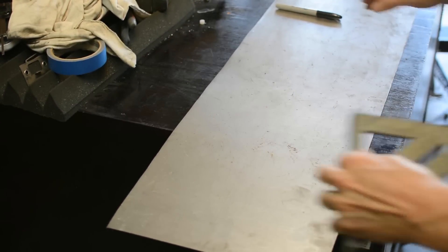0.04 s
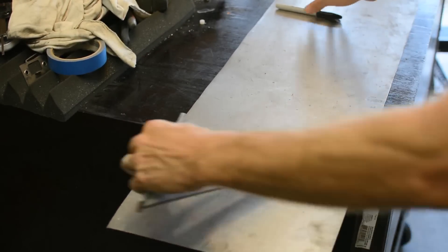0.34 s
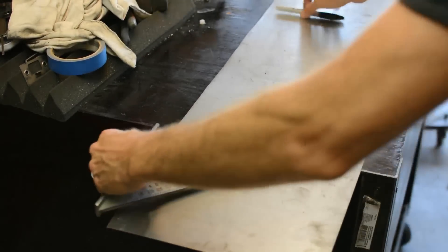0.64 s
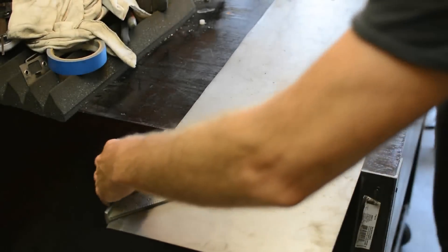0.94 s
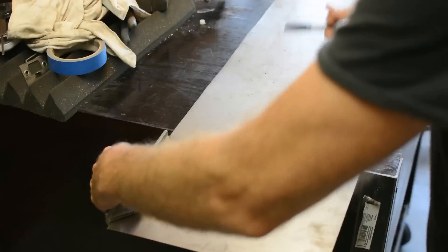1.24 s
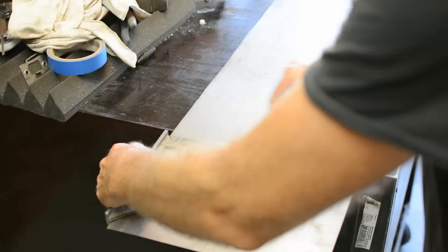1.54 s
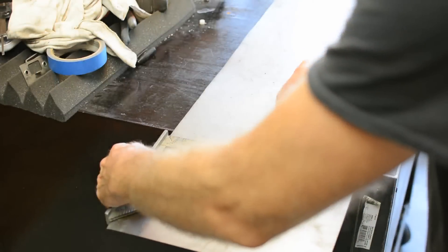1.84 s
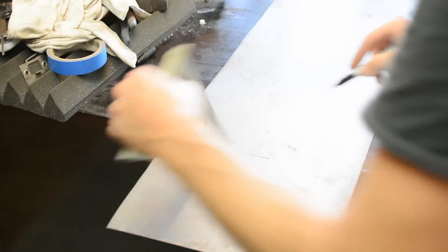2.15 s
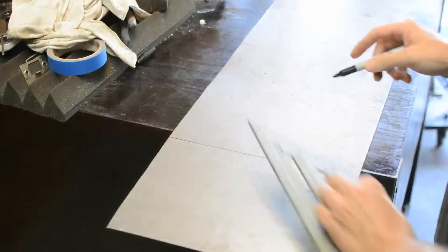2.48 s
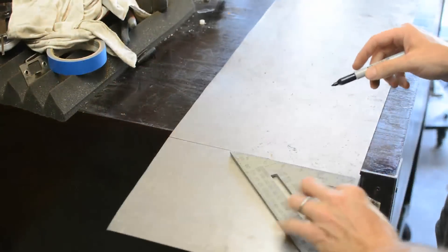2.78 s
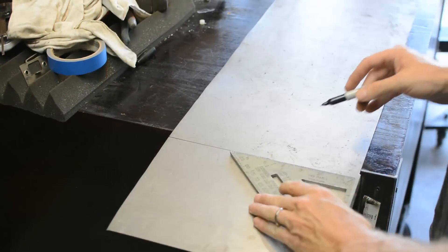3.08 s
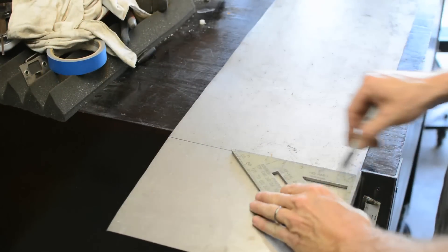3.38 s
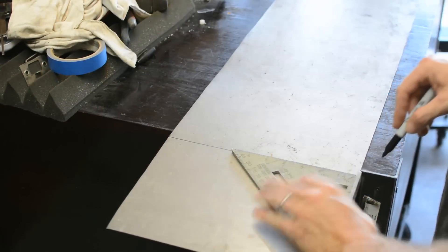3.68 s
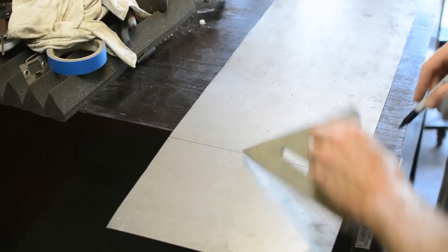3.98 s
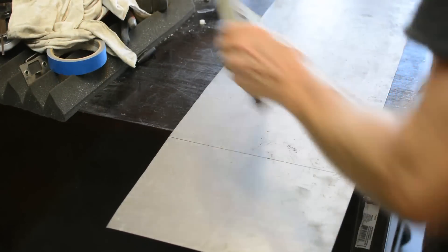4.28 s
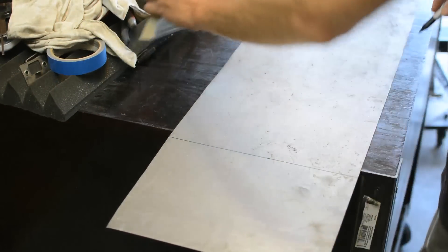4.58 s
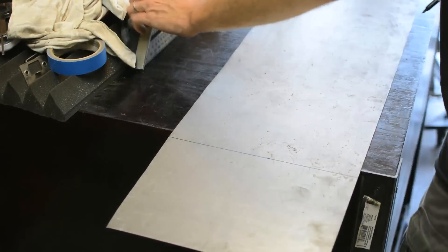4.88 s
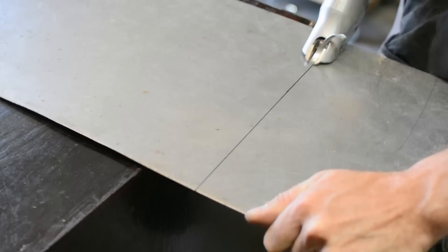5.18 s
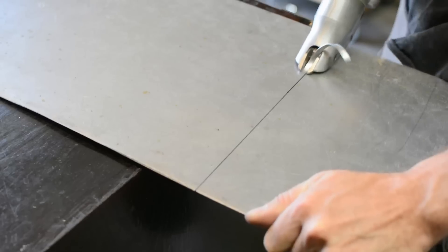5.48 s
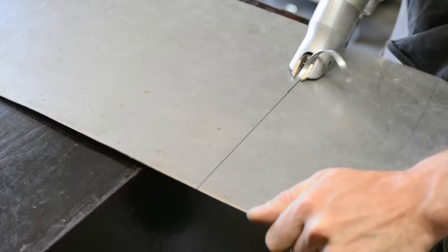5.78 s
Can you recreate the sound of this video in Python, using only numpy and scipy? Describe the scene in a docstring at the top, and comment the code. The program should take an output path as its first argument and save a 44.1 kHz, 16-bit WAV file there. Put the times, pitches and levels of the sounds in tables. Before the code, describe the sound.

Close to the microphone, a metal square is placed on sheet steel with sharp, ringing knocks over faint workshop background noise. A quiet marker stroke squeaks once, followed by a short scrape and a brush of an arm. Another bright clatter, another marker stroke and a light slide lead to two heavy knocks, the second distorting. The sound then switches suddenly to electric shears chewing through the sheet with a gear whine.

```python
"""In a small workshop a metal rafter square knocks, rings and slides as it is set on a steel sheet on a bench.
A felt marker hisses along it with one squeak, and an arm swishes back. The square clatters again,
a second line is drawn, and the square is put away with two hard knocks that overload the close microphone.
Then, abruptly, electric shears are chewing through the sheet: gears whine, sagging under load,
while each blade stroke tears the metal and excites the resonances of the housing."""
import sys
import numpy as np
from scipy import signal
from scipy.fft import rfft, irfft, next_fast_len
from scipy.io import wavfile

SR = 44100
rng = np.random.default_rng(int(sys.argv[2]) if len(sys.argv) > 2 else 0)


def store_wav(level_fs):
    """Save 16-bit WAV to argv[1]."""
    pcm = np.round(np.clip(np.atleast_2d(level_fs), -1, 1) * 32767)
    wavfile.write(sys.argv[1], SR, pcm.T.astype(np.int16))


N = 261513
TIME = np.arange(N) / SR
RING = TIME[:19200]  # time axis of one impulse response


def amp(db):
    """Decibels to amplitude ratio."""
    return 10 ** (np.asarray(db) / 20)


def unit(x):
    """Normalisation to rms 1."""
    return x / np.sqrt(np.mean(x ** 2) + 1e-20)


def read(points, hz):
    """Interpolation on a log-frequency axis."""
    f, value = np.transpose(points)
    return np.interp(np.log(hz + 1), np.log(f + 1), value)


def add(mix, start_s, sound):
    """Superposition of a delayed sound."""
    part = mix[max(round(start_s * SR), 0):][:len(sound)]
    part += sound[:len(part)]


def colour(x, spectrum, tilt_db=0):
    """Spectral shaping to rms 1, with a tilt in dB per octave across the midrange."""
    size = next_fast_len(len(x), True)
    hz = np.fft.rfftfreq(size, 1 / SR)
    octaves = np.log2(np.clip(hz, 450, 3000) / 1000)
    gain = amp(read(spectrum, hz) + tilt_db * octaves)
    return unit(irfft(rfft(x, size) * gain, size)[:len(x)])


def ringing(modes, t60, spread_db, tilt_db=0, detune=0):
    """Modal superposition: damped sinusoids whose shares vary with the spot that is struck."""
    hz, db = np.transpose(modes)
    luck, shift = rng.standard_normal((2, len(hz)))
    octaves = np.log2(np.maximum(hz, 450))
    share = amp(db + spread_db * luck + tilt_db * octaves)
    detuned_hz = hz * (1 + detune * shift)
    waves = np.sin(2 * np.pi * (detuned_hz[:, None] * RING + rng.random((len(hz), 1))))
    envelope = np.exp(-np.log(1000) * RING / t60) * (1 - np.exp(-RING / 0.00022))
    return np.sqrt(2) * (share / np.linalg.norm(share) @ waves) * envelope


def wander(rate):
    """Random modulation of rms 1, changing about rate times a second."""
    knots = rng.standard_normal(N // 20)
    return unit(np.interp(TIME * rate, np.arange(len(knots)), knots))


def grit(per_s, spread_db):
    """Stick-slip friction: a random train of impulses."""
    size = amp(spread_db * np.minimum(rng.exponential(1, N), 4)) * rng.choice([-1, 1], N)
    return unit(size * (rng.random(N) < per_s / SR))


def arch(start, length):
    """Half-sine pulse: from rest up to 1 and back."""
    return np.sin(np.pi * np.clip((TIME - start) / length, 0, 1))


def held(start, length, rise_s, fall_s):
    """Raised-cosine attack and release around a hold."""
    ramp = np.minimum((TIME - start) / rise_s, (start + length - TIME) / fall_s)
    return np.sin(np.pi / 2 * np.clip(ramp, 0, 1)) ** 2


# ring-down of bench and workshop: frequency_hz, t60_s
DECAY = [(100, 0.56), (400, 0.43), (1000, 0.35), (2500, 0.32), (5000, 0.3), (12000, 0.22)]
def die_away(x, stretch=1):
    """Frequency-dependent damping: high bands decay first; stretch scales the decay times."""
    hz, t, bands = signal.stft(x, SR, nperseg=256)
    t60 = max(stretch, .1) * read(DECAY, hz)[:, None]
    return signal.istft(bands * amp(-60 * t / t60), SR, nperseg=256)[1][:len(x)]


def workshop(x, wet_db):
    """Reverberation: convolution with the room's short, diffuse tail."""
    tail = die_away(rng.standard_normal(len(RING))) * (RING > .004)
    return x + amp(wet_db) * signal.oaconvolve(x, tail / np.linalg.norm(tail))[:N]


# spectrum of the room's background: frequency_hz, relative_db
AIR = [(15, -77.5), (25, -45), (64, -8), (239, -9), (266, -13), (297, 4.5), (322, -21.5), (349, -1.5),
       (388, -9.5), (702, -7.5), (1050, -9), (1530, -13), (1660, -14.5), (1900, -14.5), (15500, -38)]
def room_tone():
    """Ambient noise, wavering slightly, low-passed by the microphone's response."""
    air = amp(-52) * colour(rng.standard_normal(N), AIR) * amp(.5 * wander(rate=6.1))
    return signal.sosfilt(signal.butter(2, 12500, fs=SR, output="sos"), air)


# spectra of the sheet's dense modes and of the contact crack: frequency_hz, relative_db
KNOCK = [(40, -44), (110, -25), (160, -17.5), (230, -5.5), (480, -1), (660, 3), (850, 1), (1150, 1.5),
         (1800, -3), (2800, -14), (5000, -25), (9000, -42.5), (16000, -57)]
CRACK = [(300, -18.5), (1500, -1.5), (3000, 0.5), (4500, -1), (6500, -3), (9500, -3.5), (12000, -11.5),
         (15500, -30)]
# strong modes of the sheet on the bench: pitch_hz, relative_db
BENCH_MODES = [(306.8, -44.5), (393.0, -32.5), (479.1, -37), (554.5, -38.5), (592.2, -46.5), (737.5, -34.5),
               (791.3, -41), (829.0, -34), (915.2, -36), (995.9, -36), (1174, -35.5), (1362, -44.5),
               (1443, -37), (1518, -43.5), (1642, -50), (1825, -46), (1981, -53), (1997, -44)]
def knock(knock_db, tilt_db, crack_db, stretch):
    """Impact excitation: one contact gives a bright crack and drives the modes of sheet and bench."""
    direct = 1 + .5 * np.exp(-RING / 0.0007)  # direct sound stands above the reverberation
    rise = 1 - np.exp(-RING / 0.00053)  # contact takes a moment to build
    body, contact = rng.standard_normal((2, len(RING)))
    dense = amp(knock_db) * colour(body, KNOCK, tilt_db) + amp(crack_db) * colour(contact, CRACK)
    bench = amp(knock_db - 9.5) * ringing(BENCH_MODES, t60=1.35, spread_db=3.5, tilt_db=tilt_db)
    return rise * (amp(-1.5) * direct * die_away(dense, stretch) + die_away(bench, 1.68 * stretch))


def thin_bass(x):
    """High-pass at 140 Hz: the knocks and chatter are heard without deep bass."""
    return signal.sosfilt(signal.butter(4, 140, "high", fs=SR, output="sos"), x)


# blows on sheet and bench: start_s, knock_db, tilt_db_per_octave, crack_db, decay_factor
BLOWS = [(.299, -48.5, 2, -69, 0.66), (0.539, -43.5, 0, -65, 3.3), (.647, -24, 6, -29, 1.3),
         (.839, -17, 6, -21.5, 1.2), (1.058, -63, 6, -53.5, 1.1), (1.171, -64, 5, -48.5, 1.1),
         (1.776, -51, 4, -54, 1.2), (1.911, -50, -3, -54.5, 1.3), (2.652, -24, 5.5, -33.5, 2.8),
         (2.68, -19.5, 7, -24.5, 1.5), (2.819, -17.5, 8, -15.5, 0.94), (2.846, -20, 2.5, -36.5, 0.65),
         (3.268, -41.5, -3.5, -49.5, 0.72), (3.283, -41, 0.5, -43, 0.8), (3.752, -40.5, -3.5, -55, 1.6),
         (3.926, -40, 7, -47, 1.4), (4.33, -48, 0, -63.5, 0.7), (4.579, -47, 12, -65, .85),
         (4.667, -41.5, 12, -39.5, 1.4), (4.674, -7.5, -6, -33.5, 0.63), (4.887, -20, 9, -25, 0.26),
         (4.8974, 0, 5.5, -16, .25), (4.904, -4.5, 0.5, -34.5, 1.23)]
def blows():
    """Isolated impacts, each with its own force and damping."""
    out = np.zeros(N)
    for start, *blow in BLOWS:
        add(out, start, knock(*blow))
    return out


# modes of the square, held in the hand and flat against the bench: pitch_hz, relative_db
HELD_MODES = [(2347, -43.5), (3117, -52.5), (3246, -42), (3580, -55.5), (3758, -40), (3898, -46.5),
              (4689, -57), (4802, -37), (4947, -59), (5308, -46), (5911, -46.5), (7117, -44.5), (7510, -48),
              (8048, -55), (8667, -61), (9249, -47.5), (9539, -51), (11832, -57), (12500, -62.5)]
FLAT_MODES = [(893.6, -32.5), (995.9, -48.5), (1373, -42.5), (1992, -27.5), (2369, -50.5), (2724, -55),
              (3257, -28), (3741, -30.5), (4161, -28), (4570, -50.5), (4721, -49), (4947, -48), (5071, -32),
              (5211, -31), (5362, -44), (5410, -57), (6126, -47), (7074, -44.5), (7510, -42.5), (8333, -34),
              (9087, -37), (9222, -43.5), (9582, -50.5), (9641, -39.5), (9959, -49.5), (11800, -44)]
# taps on the square: start_s, held_db, flat_db, tilt_db_per_octave
TAPS = [(0.647, -29, -42, 3.5), (.844, -17, -32, 3.5), (.95, -59, -30.5, -10.5), (2.421, -51.5, -56, 3),
        (2.605, -49, -72, -3.5), (2.681, -34, -28.5, 2.5), (2.818, -18, -8, 1), (2.846, -51, -17.5, -7.5),
        (2.894, -33, -31, 3), (4.667, -34, -55, 8.5), (4.773, -31, -62.5, 2.5), (4.807, -31.5, -60, -0.5),
        (4.901, -30, -30, -1)]
def square():
    """Free vibration of a struck plate, with a brief clash of modes detuned and damped by contact."""
    out = np.zeros(N)
    for start, held_db, flat_db, tilt_db in TAPS:
        for modes, db in (HELD_MODES, held_db), (FLAT_MODES, flat_db):
            clash = ringing(modes, t60=.13, spread_db=2, tilt_db=tilt_db, detune=.005)
            free = ringing(modes, t60=.3, spread_db=2.5, tilt_db=tilt_db)
            add(out, start, amp(db) * (amp(2) * clash + amp(-6) * free))
    return out


# chatter of the settling square: start_s, length_s, knock_db, tilt_db_per_octave, crack_db
RATTLES = [(.665, 0.2, -33.5, 0.5, -44), (0.864, 0.1, -22, 1, -63), (2.689, 0.11, -16, 1.5, -26.5),
           (4.7, 0.063, -14.5, -5, -39.5)]
def rattles(gap_s=.008, settle_db_per_s=38):
    """Inelastic bouncing: three corners strike in turn, unevenly and ever more weakly."""
    out = np.zeros(N)
    for start, length, knock_db, tilt_db, crack_db in RATTLES:
        corners = [knock(knock_db, tilt_db, crack_db, stretch=0.89) for _ in range(3)]
        for k, jitter in enumerate(rng.random(size=40)):
            delay = (k + jitter) * gap_s
            if delay < length:
                add(out, start + delay, amp(-5.5 - settle_db_per_s * delay) * corners[k % len(corners)])
    return out


# slides of the square over the sheet: start_s, length_s, rumble_db, hiss_db
SLIDES = [(0.76, .12, -28.5, -35), (2.001, 0.22, -30.5, -37.5), (3.026, 0.087, -65, -47.5),
          (3.77, 0.21, -48.5, -53), (3.905, 0.2, -35.5, -40.5)]
def slides():
    """Sliding friction: tiny slips shake sheet and square, growing as a power of the speed."""
    slips = grit(per_s=1800, spread_db=-1)
    rumble = colour(slips, KNOCK, tilt_db=0.9)
    modes = ringing(HELD_MODES, t60=.3, spread_db=2, tilt_db=6)
    ring = unit(signal.oaconvolve(slips, modes)[:N])
    hiss = amp(-5.5) * colour(slips, CRACK) + amp(-4.5) * ring
    out = np.zeros(N)
    for start, length, rumble_db, hiss_db in SLIDES:
        speed = arch(start, length)
        out += amp(rumble_db) * speed ** 2.9 * rumble + amp(hiss_db) * speed ** 1.46 * hiss
    return out


# spectrum of felt on steel: frequency_hz, relative_db
FELT = [(880, -38), (1500, -4), (1930, -10.5), (2490, -8), (2720, -9.5), (6300, -9.5), (9960, -6.5),
        (11500, -8.5), (15500, -30)]
# marker strokes: start_s, length_s, drum_db, hiss_db
STROKES = [(1.325, 0.4, -43.5, -47.5), (3.32, 0.29, -46.5, -46)]
def marker():
    """Fibre friction: felt hisses on touch, drums the sheet as the hand bears down and squeaks once."""
    fibres = grit(per_s=3800, spread_db=0)
    drum = amp(-3.5) * colour(fibres, KNOCK, tilt_db=-4.4)
    hiss = colour(fibres, FELT)
    squeak_hz = 1362 + 30 * wander(rate=240)
    squeak = unit(np.sin(2 * np.pi * np.cumsum(squeak_hz) / SR))
    out = amp(-42.5) * arch(start=1.41, length=.14) * squeak
    for start, length, drum_db, hiss_db in STROKES:
        out += amp(drum_db) * held(start, length, rise_s=.053, fall_s=.058) * drum
        out += amp(hiss_db) * held(start, length, rise_s=.017, fall_s=.058) * hiss
    return out


# spectrum of the brushing arm: frequency_hz, relative_db
SWISH = [(120, -53), (200, -15), (357, -6.5), (459, -8.5), (980, -4), (1090, -7), (2250, -3.5), (5360, -16),
         (10800, -29.5), (15000, -44)]
def arm_swish():
    """Non-resonant friction: fine, dense slips as the arm swings back."""
    envelope = amp(-34.5) * held(start=2.272, length=.15, rise_s=.022, fall_s=.1)
    return envelope * colour(grit(per_s=7400, spread_db=3), SWISH)


# spectrum of the blade grinding the sheet: frequency_hz, relative_db
CUTTING = [(65, -61), (110, -22.5), (232, -24.5), (316, -20), (414, -17), (576, -10.5), (769, -10.5),
           (871, -6), (966, -9.5), (1400, -10), (1910, -12.5), (2610, -11), (2950, -16), (7500, -21.5),
           (10900, -21), (15500, -43)]
# resonances of gear housing and sheet: centre_hz, width_hz, relative_db
HOUSING = [(323.4, 34, -22), (1116, 96, -16.5), (1414, 140, -9.5), (1718, 41, -15.5), (2800, 170, -28),
           (2210, 60, -22), (3370, 130, -26), (3810, 620, -19)]
# gear-mesh frequency, sagging under load: time_s, pitch_hz
GEAR_SPEED = [(5.2, 875.4), (5.34, 906), (5.632, 842.5), (5.722, 849), (5.902, 912.6), (5.93, 906)]
# partials of the gear whine: frequency_ratio, relative_db
WHINE = [(1, -0.5), (1.29, -16.5), (2, -19), (3, -13.5), (4, -24)]
def shears(teeth=23, free_hz=913):
    """Forced vibration: meshing gears whine; each blade stroke grinds the sheet and rattles the housing."""
    whine_hz = np.interp(TIME, *np.transpose(GEAR_SPEED))
    whine_db = -20.5 + 0.14 * (whine_hz - free_hz)  # fades as the load pulls the speed down
    mesh = np.cumsum(whine_hz * (1 + 0.001845 * wander(rate=90))) / SR
    stroke = mesh / teeth
    whine = np.sqrt(2) * sum(amp(db) * np.sin(2 * np.pi * ratio * mesh) * (1 + 0.12 * wander(rate=86))
                             for ratio, db in WHINE)
    shake = amp(-46.5) * unit(np.sin(4 * np.pi * stroke))  # the blade reverses twice a stroke
    bite = 1 + 0.63 * np.exp(-(stroke % 1) / 0.14) + 0.043 * np.cos(4 * np.pi * mesh)
    # the same tooth flaws come round with every stroke; the tearing of the metal never repeats
    flaws = rng.standard_normal(1024)
    repeating = np.interp(stroke % 1 * len(flaws), np.arange(len(flaws)), flaws)
    tearing = grit(per_s=12000, spread_db=1.2)
    drive = bite * (tearing + 0.7 * repeating)
    clatter = amp(-2.1) * colour(workshop(drive, wet_db=-11.5), CUTTING)
    for hz, width, db in HOUSING:
        clatter += amp(db) * unit(signal.lfilter(*signal.iirpeak(hz, hz / width, SR), drive))
    return amp(whine_db) * whine + amp(-21.5) * clatter + shake


# reflections reaching the two microphone ports differently: frequency_hz, side_minus_mid_db
PORTS = [(100, -38.5), (1000, -62.5), (4000, -64.5), (7500, -38), (9000, -12.5), (12000, -8.5),
         (15000, -22.5)]
# spectrum of the ports' own hiss: frequency_hz, relative_db
HISS = [(30, -18.5), (300, 4.5), (2000, 0), (6000, -14), (11500, -12.5), (15500, -31)]
def stereo_ports(mid):
    """Decorrelation: scattered reflections, mostly top treble, and faint hiss form the side signal."""
    scatter = rng.standard_normal(800)
    size = next_fast_len(N + len(scatter), True)
    side_gain = amp(read(PORTS, np.fft.rfftfreq(size, 1 / SR)))
    difference = rfft(scatter / np.linalg.norm(scatter), size) * side_gain
    side = irfft(rfft(mid, size) * difference, size)[:N]
    side += amp(-63.5) * colour(rng.standard_normal(N), HISS)
    return np.array([mid + side, mid - side])


def scene(shears_start_s=5.197):
    """Superposition over the room tone: marking out, then an abrupt switch to cutting."""
    air = room_tone()
    marking = thin_bass(blows() + rattles())
    marking += workshop(square(), wet_db=-12)
    marking += amp(-4.5) * workshop(slides() + marker(), wet_db=-1)
    marking += workshop(arm_swish(), wet_db=-6)
    return stereo_ports(air + np.where(TIME < shears_start_s, marking, shears()))


def record(dry):
    """Overload: hard clipping at full scale, then DC blocking and a band limit."""
    clipped = np.clip(dry, -1, 1)
    centred = signal.sosfilt(signal.butter(1, 25, "high", fs=SR, output="sos"), clipped)
    lowpass = signal.firwin(511, 15700, window=("kaiser", 9), fs=SR)
    return signal.oaconvolve(centred, lowpass[None], "same")


dry = scene()
out = record(dry)
store_wav(out)
```